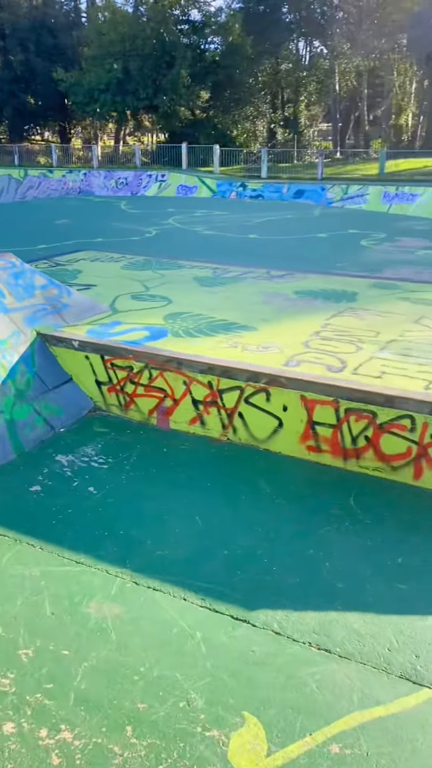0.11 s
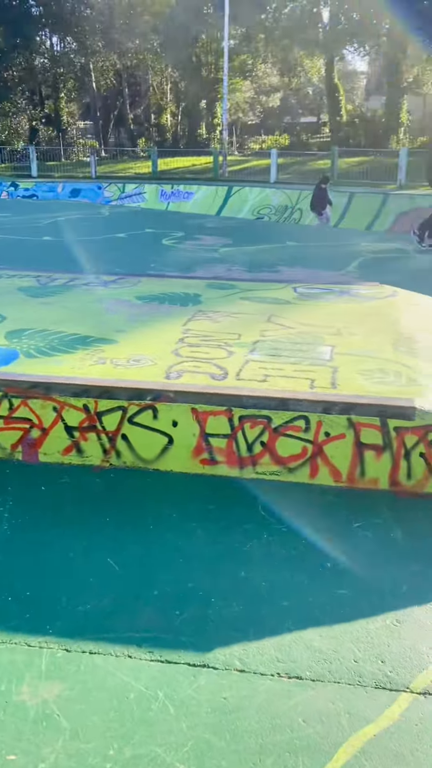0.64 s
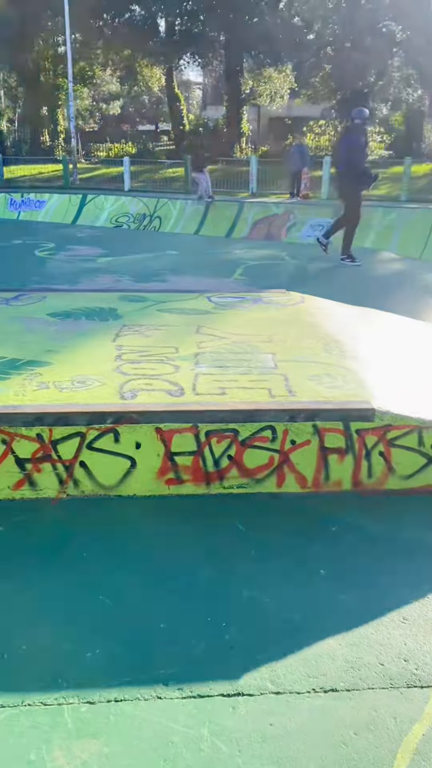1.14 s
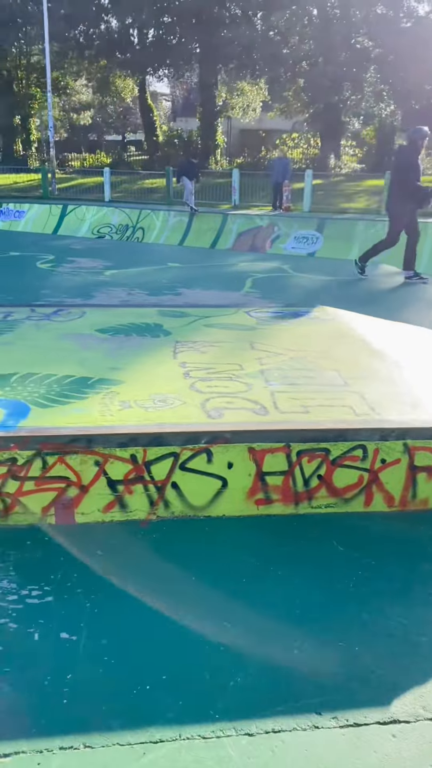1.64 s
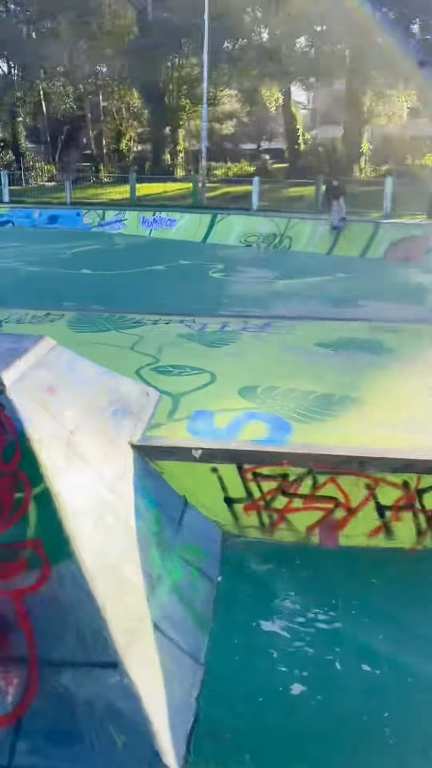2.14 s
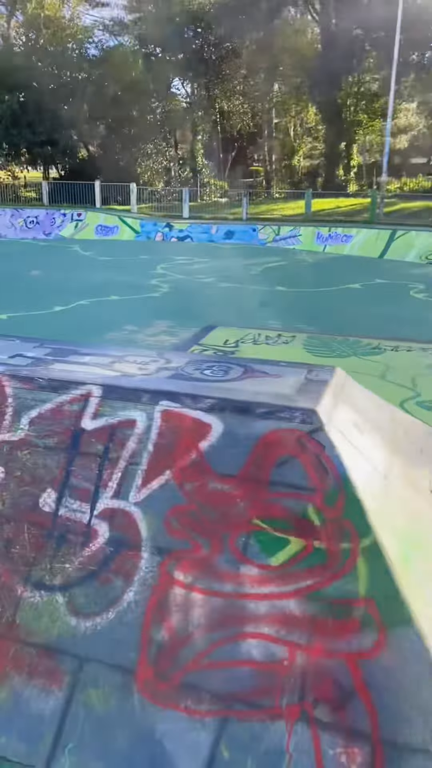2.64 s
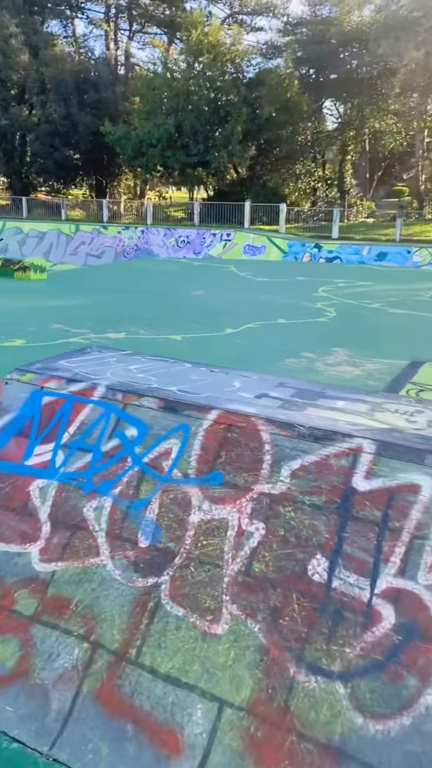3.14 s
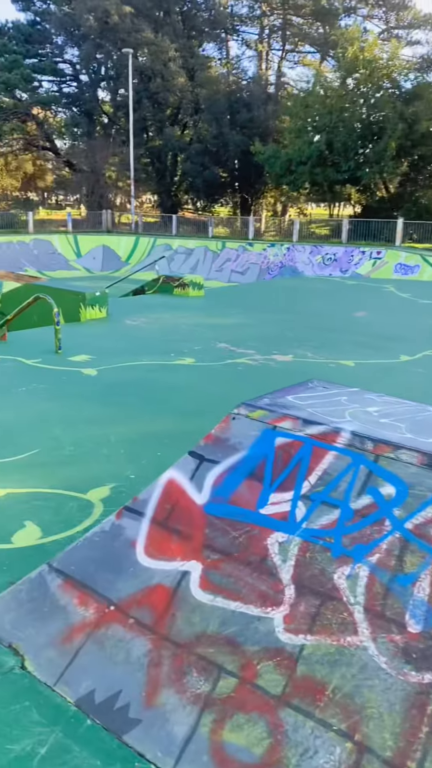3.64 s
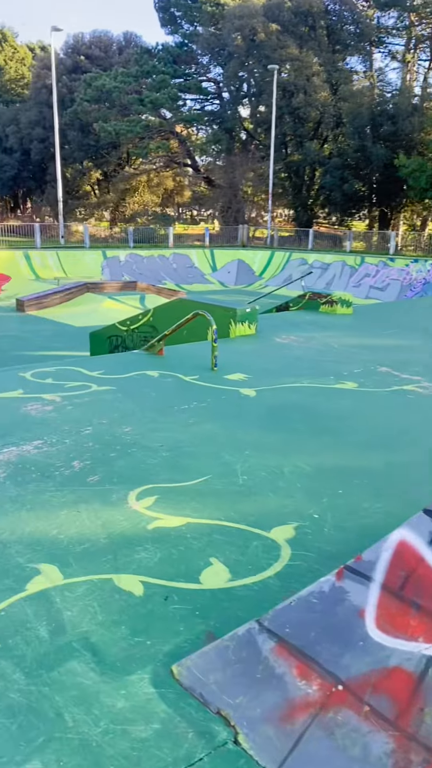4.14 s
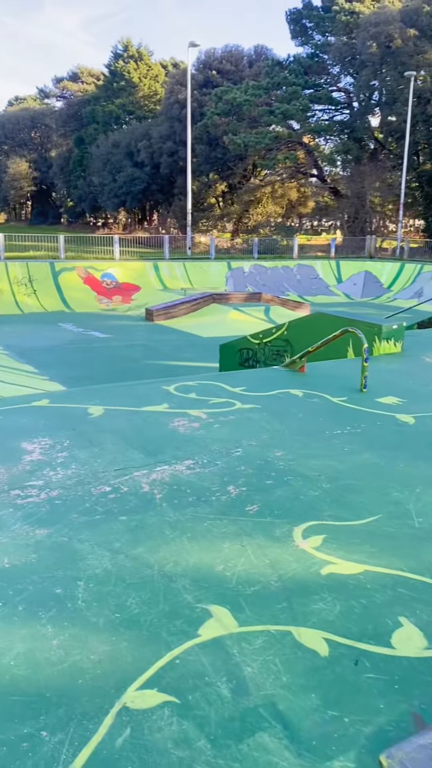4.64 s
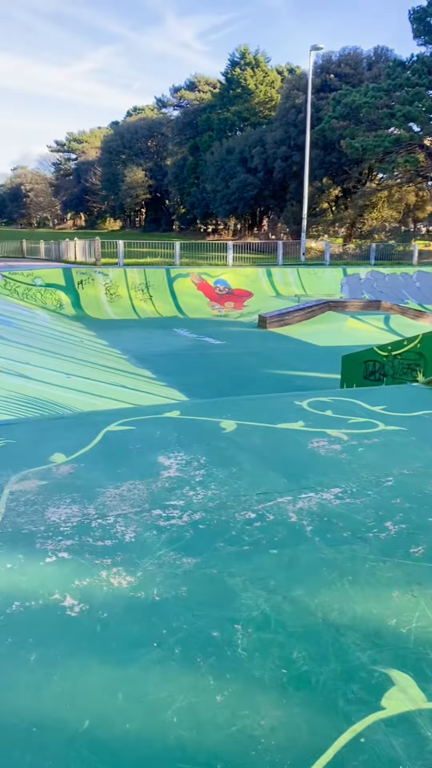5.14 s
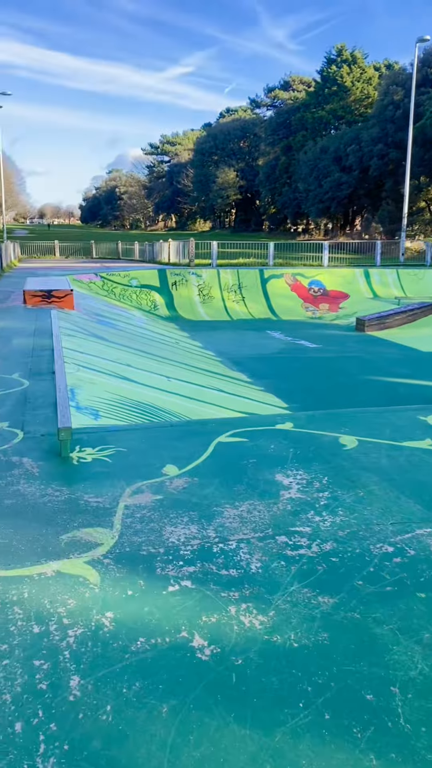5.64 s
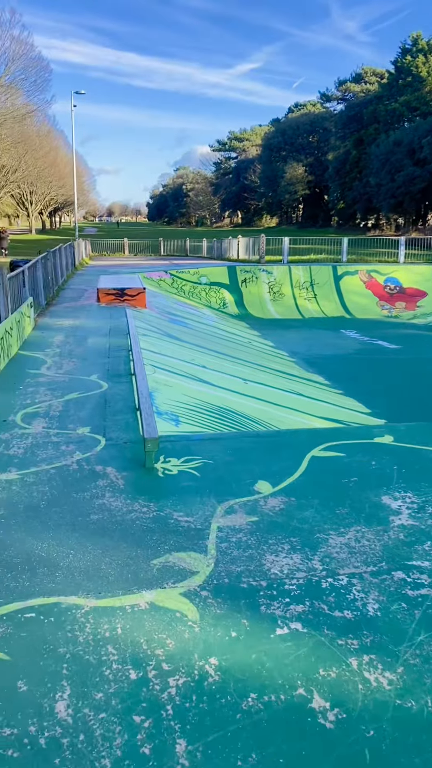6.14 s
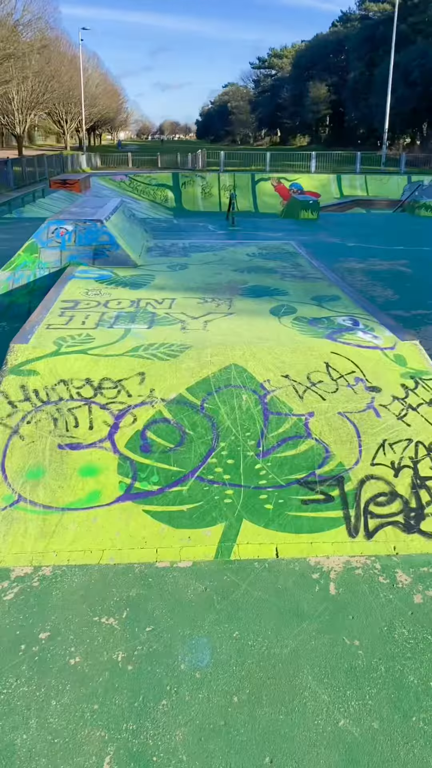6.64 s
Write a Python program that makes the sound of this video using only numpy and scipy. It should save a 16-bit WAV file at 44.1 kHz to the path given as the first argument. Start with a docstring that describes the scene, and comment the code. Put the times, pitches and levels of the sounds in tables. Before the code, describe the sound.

A board rolls with a hollow low rumble through an open skatepark, broken by rattling chatter, hard wooden clacks and brief wind buffets.

```python
"""A concrete skatepark, crossed by a rider on a board who holds a phone upright.
Filtered noise excites the deck modes, so the wheels rumble through it from below; loose hardware and grit,
driven by pulses and scraping noise, rattle in bursts. Low resonant noise makes the wind thud on the ports.
Other boards ahead roll and hum as narrow noise bands; boards, the own one at 2.3 s and others ahead, slap the
ground as sums of decaying modes, with a first echo and a short tail, as convolution with decaying noise."""
import sys
import numpy as np
from scipy import signal
from scipy.fft import rfft, irfft, next_fast_len
from scipy.io import wavfile
from scipy.ndimage import uniform_filter1d, minimum_filter1d

SR = 44100
rng = np.random.default_rng(int(sys.argv[2]) if len(sys.argv) > 2 else 0)


def how_loud(loudness_db):
    """Turn decibels into a plain amplitude multiplier (0 dB gives 1, 20 dB gives 10)."""
    steps = np.asarray(loudness_db, float) / 20
    return 10 ** steps


def dump_mix(stems):
    """Bounce the given channels to the path in sys.argv[1] as a 16-bit WAV at rate SR."""
    frames = np.atleast_2d(stems).T  # one column per channel
    limited = np.clip(frames, -1, 1)  # hard clip at full scale
    pcm = np.round(limited * 32767).astype(np.int16)
    wavfile.write(sys.argv[1], SR, pcm)


N = 298116

# Rolling of the own board. Columns: time_s, deck_db, thrum_db
OWN_ROLLING = [(0.0, -34.5, -51), (.36, -28.5, -41.5), (.56, -26.5, -37), (.75, -32, -35),
               (.94, -30.5, -36.5), (1.32, -31, -36.5), (1.45, -30, -48), (1.73, -31.5, -36),
               (1.98, -35.5, -52), (2.3, -30.5, -45), (2.6, -28, -41.5), (2.75, -36, -39.5),
               (2.92, -31.5, -42), (3.14, -37, -41), (3.39, -31, -41), (3.86, -38.5, -42),
               (4.1, -40.5, -45.5), (4.45, -36.5, -44), (4.8, -37.5, -55), (5.08, -37, -43),
               (5.3, -36.5, -67), (5.67, -33, -39), (6.12, -40, -49), (6.35, -33, -46.5),
               (6.6, -33.5, -50.5), (6.64, -58, -57), (6.76, -60, -60)]
# Treble of the own wheels. Columns: time_s, hiss_db, sizzle_db
OWN_TREBLE = [(0.0, -57.5, -63.5), (.2, -58.5, -71.5), (.8, -57.5, -63), (1.35, -63.5, -75.5),
              (1.73, -59, -71), (2.1, -66, -79), (2.27, -51, -67), (2.5, -59, -61.5), (2.73, -62.5, -72),
              (2.92, -58.5, -65.5), (3.03, -55.5, -66), (3.07, -57, -71), (3.14, -59, -74),
              (3.26, -60, -69), (3.7, -66, -69.5), (3.78, -64, -58), (3.85, -63, -76), (4.05, -67, -72),
              (4.12, -58, -77), (4.16, -61.5, -58), (4.22, -70, -83), (4.33, -61, -71), (4.55, -68, -74),
              (4.69, -57, -70), (4.85, -67, -80), (4.89, -63, -66), (4.94, -63.5, -74), (5.67, -64, -75),
              (5.89, -61, -71), (6.23, -71, -79), (6.46, -56, -69), (6.6, -50, -60), (6.63, -67, -67),
              (6.76, -65, -64)]
# Deck resonances under the rider. Columns: centre_hz, width_hz, level_db
DECK_MODES = [(282, 230, -9.5), (388.7, 85, 4), (574, 124, 0), (1004, 410, -13.5), (1420, 260, -16)]
# Low thrum resonances, applied twice. Columns: centre_hz, width_hz, level_db
THRUM_MODES = [(121, 57, 0), (209.5, 187, 0.000034)]
# Hiss resonances, applied twice. Columns: centre_hz, width_hz, level_db
HISS_MODES = [(2900, 2190, -0.5), (4310, 1800, 4), (6250, 1640, 1.5), (8160, 560, -0.5)]
# Sizzle resonances, applied twice. Columns: centre_hz, width_hz, level_db
SIZZLE_MODES = [(9810, 560, -4), (11340, 1900, -2.5), (11830, 810, -1), (15000, 1000, -9.5)]
# Bursts of rattling over rough patches; dull_db is relative to the bright part.
# Columns: start_s, length_s, first_db, last_db, dull_db
RATTLE_BURSTS = [(0.032, 0.024, -53, -67, 6), (0.124, 0.071, -71, -49, 2), (0.166, 0.19, -51, -54, -4),
                 (0.338, 0.19, -56, -50, 0), (1.54, 0.068, -48, -86.5, -2), (1.978, 0.21, -63, -43.5, 1.5),
                 (2.21, 0.1, -52, -62, 11), (2.368, 0.034, -44, -55, -14), (3.062, 0.15, -45, -49, 7.5),
                 (3.222, 0.47, -66, -69, 2), (2.55, 0.18, -55, -61, -4), (3.58, .19, -72, -68, 3),
                 (3.915, 0.17, -49, -62, 0), (4.199, 0.042, -66, -54, 6.5), (4.37, 0.12, -60, -64, 1),
                 (4.622, 0.13, -51, -67, 13), (5.255, .1, -59, -70, 7), (5.412, 0.066, -55, -59, 8),
                 (5.486, 0.11, -58, -54, 8.5), (5.604, .09, -54, -51.5, 5), (5.689, 0.286, -55, -54, 8),
                 (5.994, 0.013, -48, -51, 19), (6.08, 0.062, -46, -75, 8), (6.335, 0.12, -46.5, -51.5, 11),
                 (6.465, 0.13, -49.5, -48.5, 9.5)]
# Single clacks and ticks of loose hardware, loud and faint; dull_db is relative.
# Columns: start_s, level_db, dull_db
SINGLE_CLACKS = [(.045, -47.5, 9), (.12, -49, -12), (0.134, -48, -11.5), (.15, -48, -12), (0.158, -40, -6),
                 (0.176, -32, -1), (0.1874, -30, -6), (.199, -37, -2), (.2065, -33, 0), (0.2176, -33, -3),
                 (0.229, -32, -1), (0.2412, -30, -1), (0.254, -36, -8), (0.27, -42, -1), (0.279, -40.5, 4),
                 (0.3057, -39, 1), (0.351, -36, -3), (0.36, -38, 3), (0.3687, -36, 13), (0.386, -38, -8),
                 (.408, -34, 2), (0.424, -44, 18), (0.437, -36, 4), (0.456, -33, -2), (0.465, -35, 1),
                 (0.472, -36, 0), (0.4895, -32, -6), (0.514, -36.5, 3), (0.53, -34, 1), (.552, -46, -1),
                 (1.1924, -47, 6), (2.027, -50, -14), (2.051, -40, -10), (2.066, -41, 3), (2.0974, -27, -9),
                 (2.124, -30.5, -2.5), (2.142, -28.5, -2), (2.15, -32, -5), (2.166, -31, 1),
                 (2.1726, -32, -18), (2.186, -30.5, -7), (2.2163, -29.5, -2), (2.2324, -39, -3),
                 (2.2427, -35, -5), (2.256, -35, -15), (2.369, -39, 5), (3.058, -31.5, -4),
                 (3.069, -38, -8), (3.096, -39, 1), (3.133, -33, 9), (3.141, -35, 4), (3.178, -40, -5),
                 (3.183, -31.5, 9), (3.191, -40, 8), (3.207, -45, 0), (3.216, -45, 7), (3.223, -50, 3),
                 (3.236, -49, 11), (3.378, -62, 0), (3.403, -50, 8), (3.551, -51, 6), (3.5838, -37.5, -1.5),
                 (3.61, -55, -8), (3.624, -46, -1), (3.637, -50, -5), (3.649, -48, -5), (3.674, -41.5, -4),
                 (3.728, -46, -7), (3.764, -48, 11), (3.975, -52, 6), (4.0, -46, -4), (4.152, -55, -1),
                 (4.233, -53, 2), (4.287, -59, -10), (5.421, -54, 3), (5.462, -33.5, 1), (5.492, -53, 6),
                 (5.503, -47, 7), (5.525, -45, 5), (5.554, -41, 0), (5.57, -48, 6), (5.581, -52, 3),
                 (5.591, -46, 11), (5.607, -56, 3), (5.618, -52, 1), (5.662, -41, -1), (5.675, -48, 0),
                 (5.686, -48, 3), (5.6976, -45, 6), (5.711, -43, 11), (5.729, -44, 11), (5.744, -47, 5),
                 (5.776, -45, 4), (5.793, -40, 5), (5.801, -42, 3), (5.8147, -36, 11), (5.828, -49, -2),
                 (5.843, -39, -1), (5.891, -39, 5), (5.905, -41, 2), (5.913, -43, 5), (5.923, -38, 0),
                 (5.949, -40, -5), (5.957, -43, 4), (6.2, -59, 0), (6.219, -55, 0), (6.232, -58, 11),
                 (6.47, -46, 11), (6.513, -38, 11), (6.539, -39, 9), (6.557, -48, 9)]
# Longer scuffs of the hardware, before 60 samples are added; dull_db is relative.
# Columns: start_s, length_s, level_db, dull_db
HARDWARE_SCUFFS = [(3.074, 0.011, -43, 0), (3.108, .009, -47, 8), (3.12, 0.009, -44, 3),
                   (3.153, 0.013, -41.5, 4), (5.54, 0.0074, -50, 2), (5.636, .015, -61, 0),
                   (5.757, 0.0056, -55, 4), (5.863, 0.012, -42.5, 3), (6.477, 0.0082, -45, 2),
                   (6.495, 0.011, -42.5, 7), (6.52, .01, -43, 4), (6.543, 0.0075, -41.5, 7),
                   (6.564, 0.0059, -44, 7), (6.574, .009, -38.5, 6), (6.588, 0.0056, -40, 10),
                   (6.608, 0.0073, -44, 9.5)]
# Bright resonances of the hardware. Columns: centre_hz, width_hz, level_db
BRIGHT_MODES = [(3390, 380, -3.5), (3910, 410, 7), (4430, 490, 9.5), (4630, 350, 11), (5180, 240, 7.5),
                (6370, 1360, -6.5), (7400, 640, -4), (10700, 820, -19), (15000, 2000, -30)]
# Dull resonances of the hardware. Columns: centre_hz, width_hz, level_db
DULL_MODES = [(970, 330, -2), (1255, 90, 10), (1650, 310, 3.5), (2147, 310, 4), (2544, 205, 3),
              (3020, 340, 3.5), (3430, 200, 2.5)]
# Extra phase lag of the left port by frequency, before the phase share. Columns: frequency_hz, phase_rad
LEFT_PHASE = [(40, 2), (150, 0.5), (340, 1.25), (700, 1.66), (1500, 0.98), (3000, 2.34), (4200, 3),
              (5200, 3), (7000, 5), (9000, 31.5), (11000, -2.5), (13200, -3), (15200, -35)]
# Rolling of other boards ahead. Columns: time_s, rolling_db, rasp_db, tone_hz
FAR_ROLLING = [(0.0, -29.5, -42, 474), (.17, -36.5, -44.5, 537), (.85, -34.5, -43, 524),
               (.97, -40, -50, 507), (1.45, -52.5, -54.5, 517), (1.75, -47, -58, 507),
               (2.28, -47.5, -52, 537), (2.34, -39, -39, 553), (2.47, -34.5, -42.5, 600),
               (2.62, -35.5, -42.5, 550), (2.72, -36.5, -45, 570), (2.92, -34, -44, 560),
               (3.26, -34.5, -43.5, 490), (3.65, -44, -48.5, 565), (3.86, -45, -47.5, 694),
               (4.05, -39, -46, 636), (4.42, -52.5, -50, 650), (4.69, -40.5, -41, 690),
               (4.93, -40.5, -42, 610), (5.08, -41.5, -45, 605), (5.4, -43, -44.5, 680),
               (5.67, -43, -44.5, 563), (5.95, -48, -46.5, 583), (6.12, -43.5, -45.5, 553),
               (6.23, -48.5, -49.5, 660), (6.4, -38.5, -50, 684), (6.52, -45, -48, 620),
               (6.62, -48.5, -51.5, 573), (6.76, -50.5, -48.5, 590)]
# Deck resonances of the boards ahead. Columns: centre_hz, width_hz, level_db
FAR_DECK_MODES = [(396, 98, -3.5), (545.7, 124, 0.5), (608.6, 128, 0.5), (736, 147, -1)]
# Rasp resonances of the boards ahead. Columns: centre_hz, width_hz, level_db
FAR_RASP_MODES = [(1092, 880, 1), (1641, 894, 1), (1970, 638, -4.5)]
# Drift of the other wheels across the front, left over right. Columns: time_s, pan_db
FAR_DRIFT = [(0.0, 2.5), (.3, 0), (.73, 7.5), (1.1, -8), (2.3, 4), (3.0, 3), (3.3, 8), (3.6, 1), (4.8, 2.5),
             (6.76, 1)]
# Mean wind. Columns: time_s, level_db
MEAN_WIND = [(0.0, -56), (.3, -68), (.65, -60), (1.0, -70), (1.4, -57), (2.2, -74), (2.7, -58), (3.1, -48),
             (3.4, -49), (3.65, -46), (3.85, -53), (4.05, -42.5), (4.25, -42), (4.6, -37.5), (5.3, -38.5),
             (5.6, -50), (6.1, -46), (6.28, -60), (6.76, -48.5)]
# Single bell-shaped gusts; the half width is taken at 1/e. Columns: top_s, level_db, half_width_s
WIND_GUSTS = [(.23, -68, 0.025), (.79, -41.5, 0.038), (1.02, -39, 0.044), (1.22, -49.5, 0.044),
              (1.63, -50, 0.1), (1.86, -50, 0.025), (2.86, -48, 0.03), (3.05, -44, 0.039),
              (3.2, -43, 0.054), (3.47, -50, 0.049), (4.29, -43, 0.012), (4.352, -45, 0.013),
              (4.49, -32.5, 0.021), (4.59, -29.5, 0.016), (4.74, -46, 0.025), (4.82, -43, 0.009),
              (4.939, -20, 0.016), (5.017, -20, 0.014), (5.065, -30, 0.018), (5.12, -54, .015),
              (5.2, -42, 0.029), (5.35, -41.5, 0.055), (5.48, -36, 0.056), (5.67, -29.5, 0.013),
              (5.84, -34, 0.043), (6.01, -34.5, 0.027), (6.591, -36, 0.013), (6.72, -56, 0.018)]
# Resonances of the wind at the ports. Columns: centre_hz, width_hz, level_db
WIND_MODES = [(45.7, 46.5, -7.5), (76, 31.7, 3), (118.6, 133, -5), (292, 660, -16)]
# Hums of a wheel ahead. Columns: start_s, length_s, first_hz, last_hz, width_hz, level_db
WHEEL_HUMS = [(2.342, 0.29, 1148, 1420, 70, -46), (2.425, 0.15, 780, 962, 80, -44),
              (2.642, 0.46, 694, 744, 70, -39), (3.056, 0.27, 761, 710, 89, -43.5),
              (5.67, 0.116, 950, 932, 151, -44.5), (0.626, 0.18, 1230, 1283, 90, -52),
              (1.191, .04, 1190, 1170, 50, -46.5)]
# Blows of boards, the own one at 2.3 s and others ahead, with their strong separate echoes;
# high_db and crack_db are relative.
# Columns: start_s, peak_db, low_ring_hz, high_ring_hz, high_db, crack_db, contact_ms
BOARD_BLOWS = [(1.19, -29, 580, 2920, -1, -12, 2.4), (1.212, -35, 900, 1650, 2, -6, 2.2),
               (2.2942, -7.5, 640, 1120, 2, -10, 3), (2.297, -13, 980, 1970, 3, -15, 2.2),
               (2.3, -8, 506, 1860, -9, -20, 10.7), (3.329, -21, 473, 1350, -46, -42, 0.24),
               (3.88, -1, 750, 1570, 4.5, -13.5, 1.7), (4.184, -30, 1010, 1400, -14, -20, 4.1),
               (4.351, -5.5, 780, 1580, 0, -20, 6.6), (4.356, -16.5, 530, 1200, -2, -12, 2.7),
               (4.579, -11.5, 880, 1650, -2.5, -14, 2.2), (4.585, -15.5, 600, 3000, -16, -17, 1.2),
               (4.375, -30, 800, 1440, -7, -35, 3), (4.395, -27, 900, 1440, -13, -31, 2),
               (4.402, -25, 960, 1400, 7, -28, 6.2), (4.416, -30.5, 1200, 1500, 1, -35, 5),
               (4.426, -43, 1150, 1500, -3, -35, 2), (4.62, -28, 900, 1700, -9, -28, 2),
               (4.629, -19, 960, 1590, -7, -24, 7.7), (4.685, -32, 2500, 4100, 3, -23, 1.8),
               (4.712, -29, 895, 1400, -17, -34, 2.6), (4.727, -29, 800, 1200, -14, -34, 2.6),
               (4.883, -48, 3000, 4200, -5, 7, 1.3), (4.9, -27, 480, 1650, -1, -37, 3),
               (4.981, -23, 780, 1130, 5, -29, 1), (6.022, -16, 400, 2400, -4.5, -32, 11),
               (6.025, -13, 1170, 1750, -4, -21, 1.2), (6.044, -29.5, 500, 1210, 5, -33, 2),
               (6.083, -36, 1200, 1650, 4, -40, 2), (6.089, -29, 600, 2320, 2, -24, 2.2),
               (6.323, -11, 1460, 2400, 3, -24, 3.2), (6.3256, -9, 660, 1580, 3.5, -28, 1.4),
               (6.341, -18, 681, 1900, 3, -27, 1), (6.39, -33, 800, 2200, -1, -30, 1.5),
               (6.396, -22, 714, 1330, -9, -28, 1.8), (6.491, -27.5, 700, 1400, -3, -25, 2.2)]
# Modes of a struck board. Columns: mode_hz, level_db, t60_s
BOARD_MODES = [(232, 12, 0.051), (317, 0, 0.069), (487, 3.5, 0.066), (560, 1.5, 0.047), (660, 9, 0.024),
               (811, 6, 0.025), (810, 0.5, 0.011), (934, 3, 0.032), (1057, -1, 0.049), (1177, -0.5, 0.029),
               (1440, 4, 0.024), (1650, 2.5, 0.022), (1990, 2.5, 0.015), (2320, -3, 0.032),
               (2706, 6, 0.0069), (3680, 5, 0.014), (4200, 11, 0.0027)]
# Resonances of the dry crack. Columns: centre_hz, width_hz, level_db
CRACK_MODES = [(3020, 170, 9), (4570, 4800, -1.5), (6150, 790, 6), (10420, 180, -1)]
# Stereo placing of the blows; pans are left over right, the lag is that of the left port.
# Columns: time_s, low_pan_db, high_pan_db, lag_ms
BLOW_SEATS = [(1.2, 0.1, 8, -.05), (2.3, 2, 3, -0.13), (3.33, 11, 3, -0.13), (3.88, 4, 2, -0.057),
              (4.35, 6, 3, -0.04), (4.4, 1.5, -.7, -0.084), (4.58, 2.8, 4, 0.045), (4.98, 4, -2, -0.083),
              (6.02, 3, .4, -0.044), (6.33, 1.2, -.5, -0.035), (6.45, 0, -2, -0.051)]
# First echo from the nearest bank. Columns: blow_s, delay_ms, level_db
BANK_ECHO = [(2.3, 77, -18), (3.88, 43, -12.5), (4.35, 40, -21), (4.6, 33, -9), (4.99, 32, -10),
             (6.02, 49, -33), (6.33, 95, -9)]

# lag of the left port, and level of the left port over the right
BELOW_LAG_MS, AHEAD_LAG_MS = 0.3603, -0.059
BELOW_PAN_DB, AHEAD_PAN_DB = -1.5, 3.5


def level(x):
    """Normalization: scale to rms 1."""
    return x / np.sqrt(np.mean(x ** 2))


def curves(table):
    """Linear interpolation: each column of a table, one value per sample."""
    s, *columns = np.transpose(table)
    return [np.interp(np.arange(N) / SR, s, c) for c in columns]


def walk(rate):
    """Slow random modulation: levels held 1 / rate s and slewed twice; spread near 1."""
    k = int(SR / rate)
    held = np.repeat(rng.standard_normal(N // k + 1), k)
    return 1.83 * uniform_filter1d(uniform_filter1d(held, k), k)[:N]


def low(x, hz):
    """Low-pass filtering: a third-order Butterworth slope."""
    return signal.sosfilt(signal.butter(3, hz, fs=SR, output="sos"), x)


def resonate(x, peaks):
    """Parallel resonance: neighbours of opposite sign keep the valleys between them filled."""
    return sum((-1) ** k * how_loud(db) * signal.lfilter(*signal.iirpeak(hz, hz / width, SR), x)
               for k, (hz, width, db) in enumerate(peaks))


def grit(scatter_db):
    """Impulsive noise: samples differ widely in size, like grains under a wheel; the largest is limited."""
    size = np.minimum(rng.exponential(size=N), 5)
    return rng.standard_normal(N) * how_loud(scatter_db * size)


def ports(x, lag_ms, phase_share=0):
    """Phase difference between receivers: the left port hears x with a phase lag, the right as it is."""
    size = next_fast_len(N + 512)
    hz = np.arange(size // 2 + 1) * SR / size
    table_hz, table_rad = np.transpose(LEFT_PHASE)
    extra = phase_share * np.interp(np.log(hz + 1), np.log(table_hz), table_rad)
    lag_rad = 2 * np.pi * hz * lag_ms / 1000 + extra
    left = irfft(rfft(x, size) * np.exp(-1j * lag_rad), size)[:N]
    return np.array([left, x])


def wheels(deck_db, thrum_db, hiss_db, sizzle_db):
    """Forced vibration: grit shakes the deck, throbbing with bumps of the concrete; hiss and sizzle ride on top."""
    bumps = walk(28)
    shake = grit(1.76) * how_loud(1.72 * bumps)
    # each deck resonance swells slowly and at random on its own
    deck = sum((-1) ** k * how_loud(1.4 * walk(7)) * resonate(shake, [mode])
               for k, mode in enumerate(DECK_MODES))
    deck = level(low(deck, 1470))
    thrum = level(resonate(resonate(shake, THRUM_MODES), THRUM_MODES))
    fine = grit(4.2) * how_loud(1.3 * bumps + 2.5 * walk(90))
    hiss = level(resonate(resonate(fine, HISS_MODES), HISS_MODES))
    sizzle = level(resonate(resonate(fine, SIZZLE_MODES), SIZZLE_MODES))
    return deck * how_loud(deck_db) + thrum * how_loud(thrum_db) + hiss * how_loud(hiss_db) + sizzle * how_loud(sizzle_db)


def bursts():
    """Envelope addition: over a faint uneven idle rattle, bursts start fast, drift in level and die."""
    attack_s, release_s = 0.015, 0.019
    idle_db, idle_dull_db = -68.5, 10
    t = np.arange(N) / SR
    bright = how_loud(idle_db + 1.5 * walk(5.5))
    dull = bright * how_loud(idle_dull_db)
    for s, length, first_db, last_db, dull_db in RATTLE_BURSTS:
        rise, fall = (t - s) / attack_s, 1 - (t - s - length) / release_s
        gate = np.clip(np.minimum(rise, fall), 0, 1)
        gain = gate * how_loud(np.interp(t, [s, s + length], [first_db, last_db]))
        bright, dull = bright + gain, dull + gain * how_loud(dull_db)
    return 20 * np.log10(bright), 20 * np.log10(dull / bright)


def rattle(level_db, dull_db):
    """Impact excitation: an uneven train of scratchy clacks over a rough scrape, plus single ones."""
    ticks_per_s, scrape_db = 115, -11
    rise_s, hold_s, fall_s = 0.000098, 0.0018, 0.00034
    knock = 4.0  # the clean tap that opens each clack
    count = int(N / SR * ticks_per_s)
    jitter, weakness = rng.random((count, 2)).T
    at = ((np.arange(count) + 0.77 * jitter) * N / count).astype(int)
    bright, dull = np.zeros(N), np.zeros(N)
    bright[at] = how_loud(level_db[at] + 6 - 13 * weakness)
    dull[at] = bright[at] * how_loud(dull_db[at])
    for s, db, share_db in SINGLE_CLACKS:
        bright[int(s * SR)] += how_loud(db)
        dull[int(s * SR)] += how_loud(db + share_db)

    t = np.arange(SR // 40) / SR
    burst = 0.51 * (1 - np.exp(-t / rise_s)) * np.exp(-np.maximum(t - hold_s, 0) / fall_s)
    scratch = np.sign(rng.standard_normal(N))
    flutter_db = 4.5 * walk(150)
    scrape = how_loud(level_db + scrape_db + flutter_db) * np.array([np.ones(N), how_loud(dull_db)])
    for s, length, db, share_db in HARDWARE_SCUFFS:
        i, shape = int(s * SR), np.sqrt(np.hanning(int(length * SR) + 60))
        scrape[:, i:i + len(shape)] += shape * how_loud(np.array([[db], [db + share_db]]))

    out = 0
    for taps, rasp, peaks in zip((bright, dull), scrape, (BRIGHT_MODES, DULL_MODES)):
        rough = scratch * (signal.fftconvolve(taps, burst)[:N] + rasp)
        out = out + resonate(knock * taps + rough, peaks) / resonate(scratch, peaks).std()
    return out


def rider(x):
    """Scattering: legs, deck and ground return a share of the sound from below differently to each port."""
    t = np.arange(SR // 50) / SR
    taps = rng.standard_normal((2, len(t))) * t * np.exp(-t / .0022)
    taps = signal.lfilter(*signal.butter(2, 1500, "high", fs=SR), taps)
    taps = taps / np.sqrt(np.sum(taps ** 2) / 2)
    return how_loud(-9.0) * signal.fftconvolve(x[None], taps, axes=1)[:, :N]


def own_board(hiss_db, sizzle_db):
    """Superposition: wheels and rattle from below, late at the left port, add to their scattered share."""
    below = wheels(*curves(OWN_ROLLING), hiss_db, sizzle_db) + rattle(*bursts())
    heard = ports(below, BELOW_LAG_MS, phase_share=0.76) + rider(below)
    return heard * how_loud(np.array([[BELOW_PAN_DB], [-BELOW_PAN_DB]]) / 2)


def diffuse_hiss(hiss_db):
    """Diffuse field: some of the hiss comes back from all sides, without its quick swells."""
    noise = [rng.standard_normal(N) for _ in range(2)]
    air = np.array([level(resonate(resonate(x, HISS_MODES), HISS_MODES)) for x in noise])
    calm_db = uniform_filter1d(minimum_filter1d(hiss_db, SR // 3), SR // 4)
    return air * how_loud(calm_db - 2.0)


def far_rolling(db, rasp_db, tone_hz):
    """Direct and diffuse fields: wheels ahead, their tone moving with speed, partly spread by the bowl."""
    paths = []
    for _ in range(3):
        shake = grit(1.5) * how_loud(1.8 * walk(24))
        deck = sum((-1) ** k * how_loud(-14 * np.log2(mode[0] / tone_hz) ** 2) * resonate(shake, [mode])
                   for k, mode in enumerate(FAR_DECK_MODES))
        rasp = level(resonate(shake, FAR_RASP_MODES))
        paths.append(how_loud(db) * level(deck) + how_loud(rasp_db) * rasp)
    pan_db = curves(FAR_DRIFT)[0] / 2
    direct = ports(paths[0], AHEAD_LAG_MS) * how_loud(np.array([pan_db, -pan_db]))
    return 0.71 * direct + 0.28 * np.array(paths[1:])


def gusts():
    """Amplitude addition: a wavering mean wind with single swells on top, as a level in dB."""
    t = np.arange(N) / SR
    swells = sum(how_loud(db) * np.exp(-((t - s) / width) ** 2) for s, db, width in WIND_GUSTS)
    mean = how_loud(curves(MEAN_WIND)[0] + 0.65 * walk(29))
    return 20 * np.log10(mean + swells)


def wind(db):
    """Turbulent pressure: eddies thud on both ports, mostly together; each gust is one swell of it."""
    both, left, right = (low(resonate(rng.standard_normal(N), WIND_MODES), 337) for _ in range(3))
    thud = 0.69 * both + 0.5 * np.array([left, right])
    swell = np.sqrt(uniform_filter1d(np.mean(thud ** 2, axis=0), SR // 25))
    # the noise's own swells are partly evened out
    return how_loud(db) * level(thud / swell ** 0.51)


def hums():
    """Narrow-band noise: wavering tones swell, glide with the wheel's speed and fade."""
    t, out = np.arange(N) / SR, 0
    for s, length, first_hz, last_hz, width, db in WHEEL_HUMS:
        part = np.clip((t - s) / length, 0, 1)
        phase = 2 * np.pi * np.cumsum(first_hz + (last_hz - first_hz) * part) / SR
        a, b = (level(low(rng.standard_normal(N), width / 2)) for _ in range(2))
        swell = np.sqrt(np.abs(np.sin(np.pi * part))) * (part < 1)
        out = out + how_loud(db) * swell * (a * np.cos(phase) + b * np.sin(phase))
    return ports(out, AHEAD_LAG_MS) * how_loud(np.array([[AHEAD_PAN_DB], [-AHEAD_PAN_DB]]) / 2)


def blow(low_hz, high_hz, high_db, crack_db, contact_ms, low_pan_db, high_pan_db):
    """Modal synthesis: strike and rough contact ring two mode groups, which differ from board to board; with a
    dry crack."""
    t = np.arange(SR // 8) / SR
    push = 0.05 * rng.standard_normal(len(t)) * np.exp(-t * 1000 / max(contact_ms, .1))
    push[0] = 1
    ring, side = 0, np.array([[.5], [-.5]])
    for k, (hz, db, t60) in enumerate(BOARD_MODES):
        low_share = how_loud(-28 * np.log2(hz / low_hz) ** 2 + side * low_pan_db)
        high_share = how_loud(high_db - 14.7 * np.log2(hz / high_hz) ** 2 + side * high_pan_db)
        share = low_share + high_share + how_loud(-20.5)
        # each mode reaches the two ports with its own phase
        turn_rad = side * .45 * rng.standard_normal()
        tone = np.sin(2 * np.pi * hz * t + turn_rad) * np.minimum(t * hz * 4, 1)
        ring = ring + (-1) ** k * share * how_loud(db - 60 * t / t60) * tone
    ring = signal.fftconvolve(push[None], ring, axes=1)[:, :len(t)]
    noise = rng.standard_normal(len(t)) * np.exp(-t * 1000 / (1.8 + 0.77 * contact_ms))
    crack = low(resonate(noise, CRACK_MODES), 19400)
    return ring / np.abs(ring.mean(axis=0)).max(), how_loud(crack_db) * crack / np.abs(crack).max()


def boards():
    """Reflection and reverberation: each blow arrives direct, off the nearest bank, then as a dull spread tail."""
    tail_t60_s, tail_db = 0.96, -11
    direct, (cracks, echo, onset) = np.zeros((2, N + SR)), np.zeros((3, N + SR))
    s_seat, *seat = np.transpose(BLOW_SEATS)
    s_bank, delay_ms, echo_db = np.transpose(BANK_ECHO)
    for s, db, *strike in BOARD_BLOWS:
        low_pan_db, high_pan_db, lag_ms = (np.interp(s, s_seat, c) for c in seat)
        ring, crack = (how_loud(db) * x for x in blow(*strike, low_pan_db, high_pan_db))
        sound, i = ring.mean(axis=0) + 0.64 * crack, int(s * SR)
        late = i + round(lag_ms * SR / 1000)
        direct[0, late:late + len(sound)] += ring[0]
        direct[1, i:i + len(sound)] += ring[1]
        cracks[i:i + len(sound)] += crack
        # the ring differs in every direction, so what returns keeps only the broad colour of the strike
        broad = sound * np.exp(-np.arange(len(sound)) / SR / 0.0018)
        onset[i:i + len(sound)] += broad
        j = i + int(np.interp(s, s_bank, delay_ms) * SR / 1000)
        echo[j:j + len(sound)] += broad * how_loud(np.interp(s, s_bank, echo_db))

    t = np.arange(SR) / SR
    # the bank is uneven: its echo is a few ms of scattered returns
    scatter = low(rng.standard_normal((2, SR)), 1560)
    scatter = scatter * np.exp(-t / 0.0069) * (1 - np.exp(-t / 0.0055)) * 0.34
    tail = rng.standard_normal((2, SR)) * how_loud(-60 * t / tail_t60_s) * (1 - np.exp(-t / 0.0033))
    tail = signal.lfilter(*signal.butter(2, 4200, fs=SR), tail)
    tail = how_loud(tail_db) * tail / np.sqrt(np.sum(tail ** 2) / 2)

    # the crack above about 5 kHz gets the lag and a share of the phase of sound from below
    body = low(cracks[:N], 5300)
    top = signal.sosfilt(signal.butter(3, 4900, "high", fs=SR, output="sos"), cracks[:N]) * how_loud(1.0)
    lagged_top = ports(top, BELOW_LAG_MS, phase_share=0.6) * how_loud(np.array([[.8], [-.8]]))
    near = direct[:, :N] + ports(body, AHEAD_LAG_MS) + lagged_top
    first_echo = signal.fftconvolve(echo[None, :N], scatter, axes=1)[:, :N]
    return near + first_echo + signal.fftconvolve(onset[None, :N], tail, axes=1)[:, :N]


def scene():
    """Superposition: own board rolling below, others rolling ahead, blows of boards, wind on the ports."""
    hiss_db, sizzle_db = curves(OWN_TREBLE)
    own = own_board(hiss_db, sizzle_db) + diffuse_hiss(hiss_db)
    ahead = far_rolling(*curves(FAR_ROLLING)) + hums()
    return own + ahead + boards() + wind(gusts())


def roll_off(x):
    """The treble ends steeply here."""
    return signal.sosfilt(signal.butter(12, 16600, fs=SR, output="sos"), x)


def record(dry):
    """Band limiting and saturation: a high-pass removes the deepest bass, loud peaks are rounded,
    and a steep low-pass cuts above 15.8 kHz."""
    no_bass = signal.sosfilt(signal.butter(4, 42, "high", fs=SR, output="sos"), dry)
    rounded = np.tanh(0.57 * no_bass) / 0.63
    mix = signal.sosfilt(signal.ellip(8, .2, 70, 15800, fs=SR, output="sos"), rounded)
    return roll_off(mix)


dry = scene()
out = record(dry)
dump_mix(out)
```